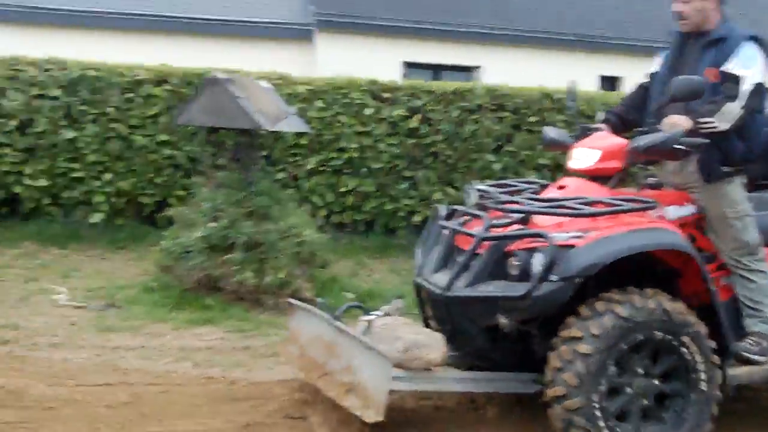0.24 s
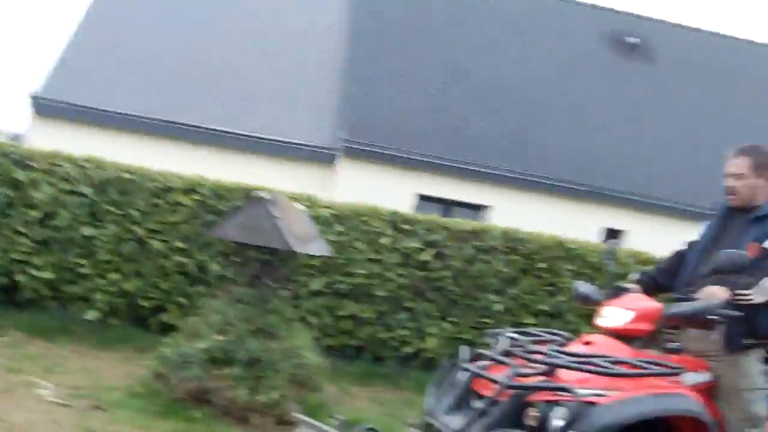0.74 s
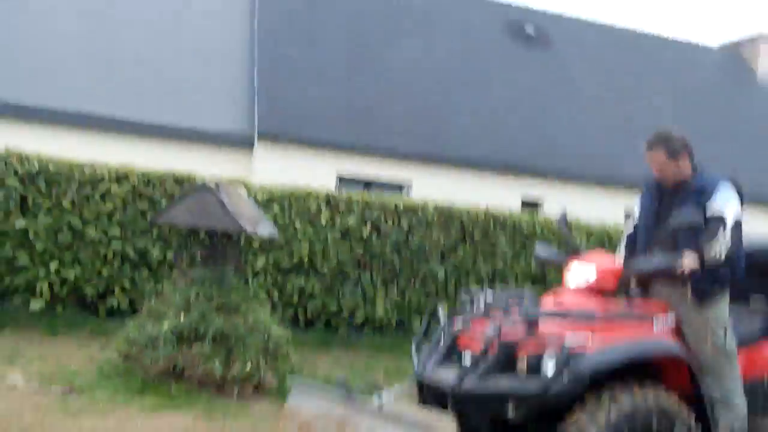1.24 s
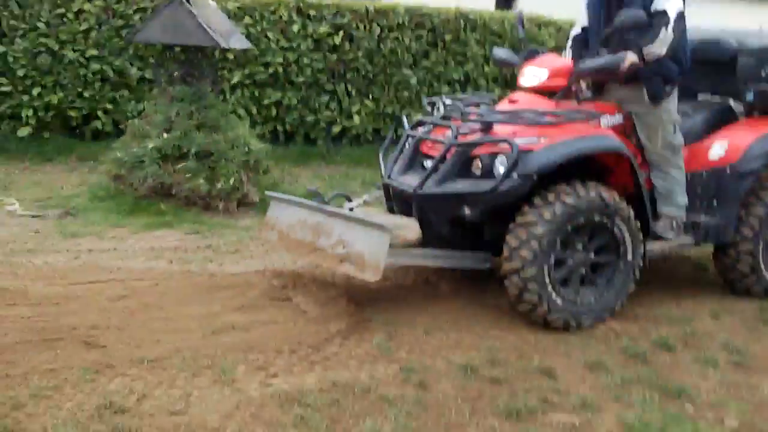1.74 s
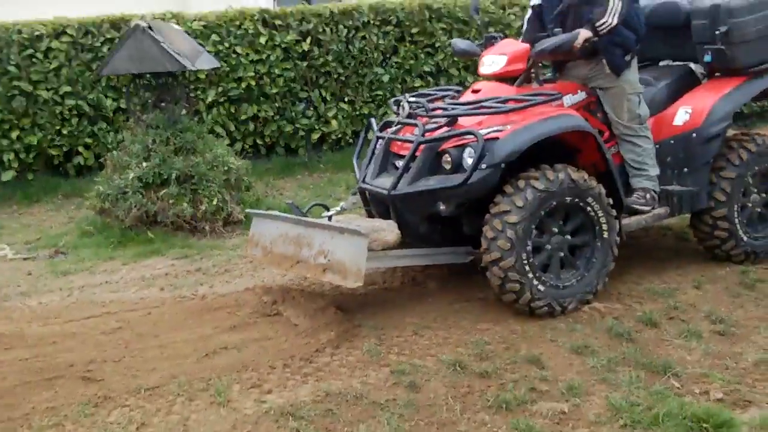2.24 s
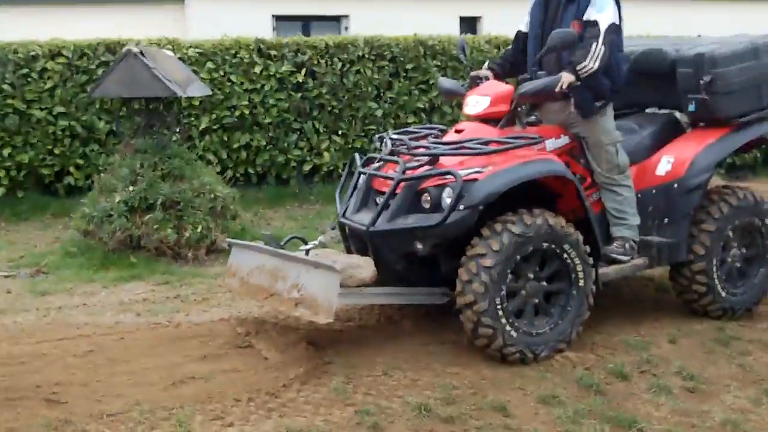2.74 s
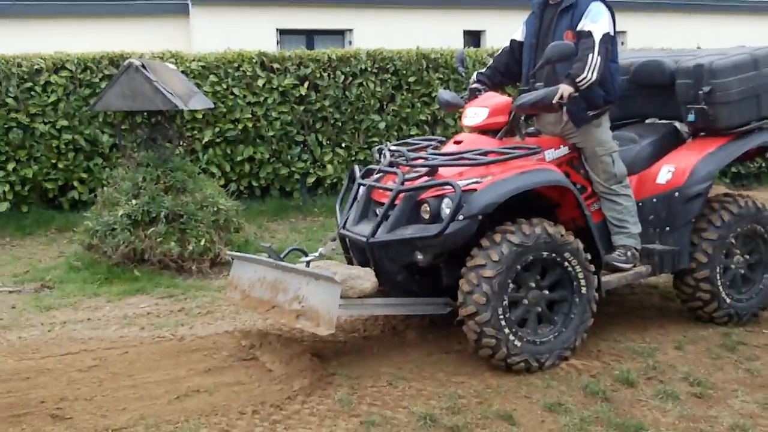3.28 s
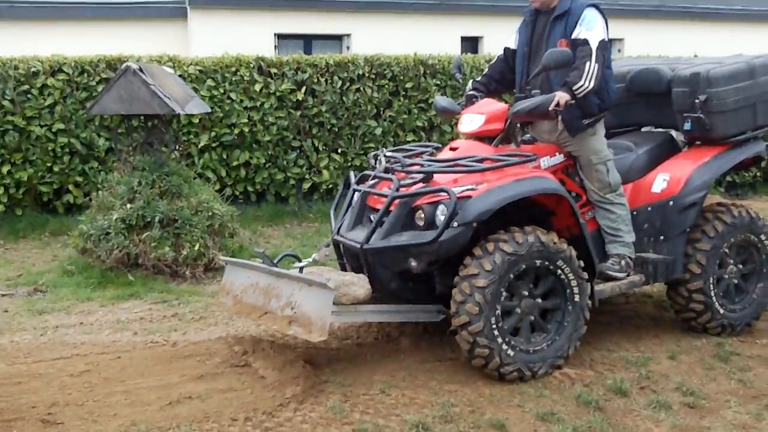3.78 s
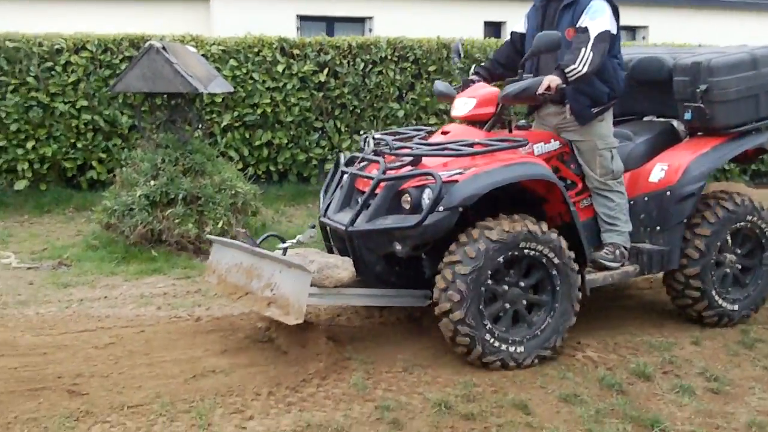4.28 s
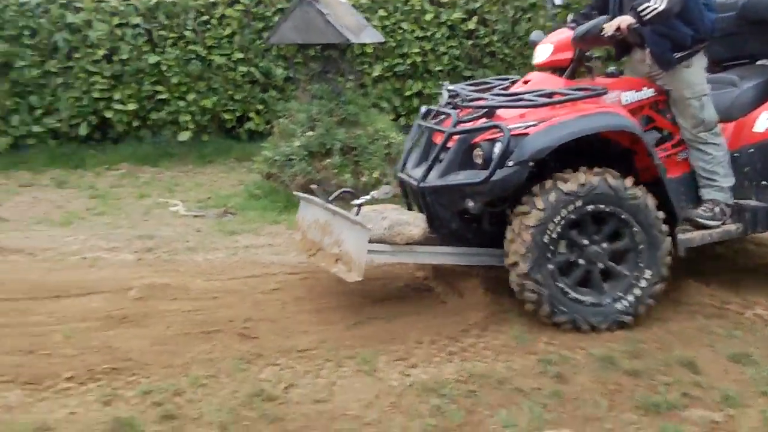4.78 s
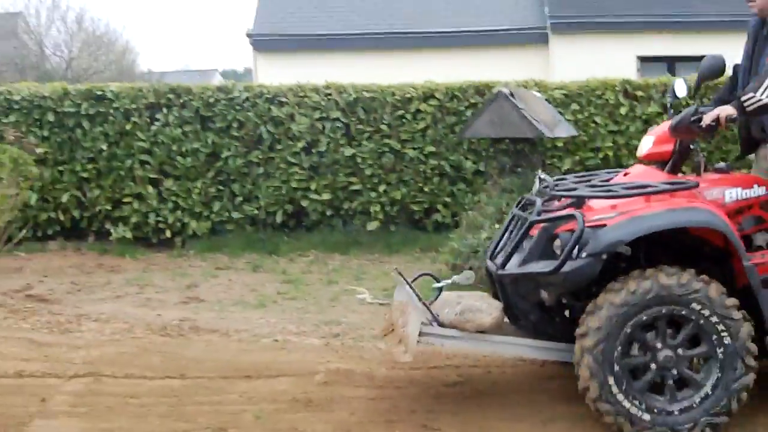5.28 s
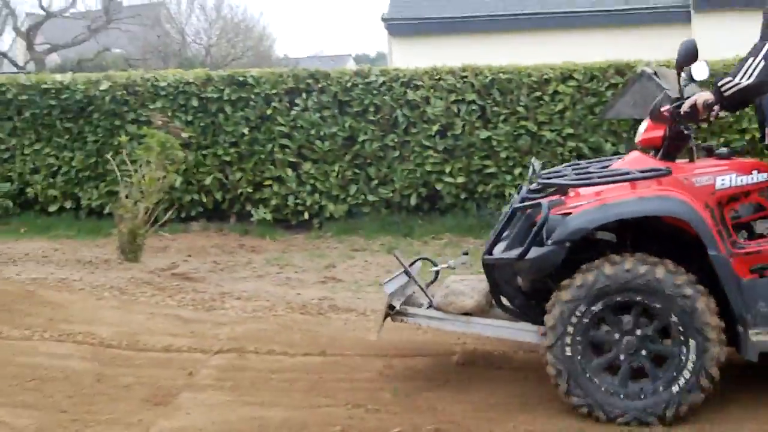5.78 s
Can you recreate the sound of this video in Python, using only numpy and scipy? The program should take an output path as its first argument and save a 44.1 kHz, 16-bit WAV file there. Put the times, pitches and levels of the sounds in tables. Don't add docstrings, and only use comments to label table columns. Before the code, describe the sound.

Low off-road engine putters, then surges into two throaty revs with metallic clatter, interrupted by loud plastic bumps, rubs and distorted jolts close up.

```python
import sys
import numpy as np
from scipy import signal
from scipy.fft import rfft, irfft
from scipy.io import wavfile
from scipy.ndimage import uniform_filter1d, map_coordinates

SR = 44100
rng = np.random.default_rng(int(sys.argv[2]) if len(sys.argv) > 2 else 0)


def dump(signal):
    limited = np.clip(np.atleast_2d(signal).T, -1, 1)
    pcm = np.round(limited * 32767).astype(np.int16)
    wavfile.write(sys.argv[1], SR, pcm)


def field_ratio(decibels):
    return 10 ** (np.asarray(decibels, dtype=float) / 20)


N = 265482
TIME = np.arange(N) / SR

# t/s, rate/firings per s
CRANK_SPEED = [(0.0, 12.08), (1.45, 12.54), (1.92, 13.21), (2.49, 13.6), (2.7, 12.38), (2.88, 13.76),
               (3.21, 12.66), (3.32, 16.66), (3.83, 20.61), (4.03, 24.27), (4.2, 22.14), (4.36, 22.91),
               (4.54, 19.71), (4.82, 19.87), (5.1, 23.65), (5.2, 22.75), (5.86, 24.96), (6.02, 23.56)]
# t/s, exhaust level/dB, load share/0-1
THROTTLE = [(0, 1.2, .03), (1.1, 0, .03), (2.4, -.3, .12), (3.2, -3.2, .09), (3.3, .3, .4), (3.5, .1, .42),
            (3.62, 3.4, .59), (3.72, 3.2, .6), (3.8, -.8, .96), (4.1, -1.8, .96), (4.2, -.2, .85),
            (4.55, -1.5, .84), (4.75, .4, .5), (5, 5, .76), (5.1, 2.8, .93), (5.3, 2.4, .95),
            (5.6, 6.1, .97), (6.02, 6.2, .82)]
# f/Hz, t60/s, signed size at idle, signed size under load
PIPE_MODES = [(54.4, 0.081, -0.199, 0.239), (81.4, 0.338, 0.075, 0.032), (111.5, 0.056, 0.909, 0.533),
              (146.0, 0.101, -2.301, -1.92), (147.2, 0.096, 2.26, 1.409), (191.8, 0.185, -0.04, -0.001),
              (258.3, 0.055, 0.035, 0.09), (294.7, 0.072, 0.025, -0.066)]
# f/Hz, t60/s, signed size at idle, signed size under load
INTAKE_MODES = [(54.4, 0.081, -0.046, 0.052), (81.4, 0.338, 0.007, 0.005), (111.5, 0.056, -0.033, -0.004),
                (146.0, 0.101, -0.035, -0.018)]
# f/Hz, t60/s, signed size
BOOM_MODE = (144.5, .3, -.33)
# f/Hz, level/dB per Hz
FLOW_SPECTRUM = [(30, -23), (70, -1.5), (110, 0.5), (145, -0.5), (190, -6.5), (240, -15), (290, -28),
                 (400, -33), (800, -120)]
# f/Hz, level/dB per Hz
GEAR_SPECTRUM = [(880, -28), (1500, -16.5), (1730, -15.5), (2010, -14), (2470, -9.5), (3010, 1),
                 (4050, -12), (4450, -10), (5200, -18.5), (6760, -37), (11400, -120)]
# f/Hz, level/dB per Hz
BELT_SPECTRUM = [(2590, -13), (4400, -6.5), (5500, -4.5), (6960, 1.5), (7800, -6.5), (8470, -14),
                 (9290, -10), (11600, -20.5), (12800, -24.5), (15200, -27), (16200, -29)]
# f/Hz, level/dB per Hz
FRAME_SPECTRUM = [(120, -37), (200, -10), (217, 12), (247, -4), (287, -2.5), (354, -20.5), (568, -14),
                  (722, -17), (865, -14.5), (1250, -21), (1460, -23), (1730, -47), (2200, -35), (2860, -65),
                  (4840, -120)]
# t/s, level/dB, length/s
SCRAPES = [
    (2.04, 4.5, 0.064),
    (3.548, 1.5, 0.12),
    (4.204, 1.5, 0.34),
    (5.305, 2, 0.17),
]
# f/Hz, level/dB per Hz
WINCH_SPECTRUM = [(880, -54), (1500, -18), (1710, -41), (1880, -18), (2080, -19), (2210, -15.5), (3180, 1),
                  (3520, -3), (5020, -12), (5440, -5.5), (6960, 1), (8570, -16.5), (9370, -10.5),
                  (12600, -31), (16000, -33)]
# f/Hz, t60/s
SHELL_MODES = [(199, 0.095), (404, 0.035), (560, 0.032), (730, 0.022), (931, 0.022), (1270, 0.037),
               (1600, 0.007), (2100, 0.024)]
# t/s, peak level/dB, low part/dB, high part/dB
TAPS = [(.54, -25, 5, -15), (0.611, -32, 6, 1), (0.738, -37, -19, 7.5), (1.021, -18.5, -5, -5.5),
        (1.598, -5.5, -7, -7), (1.707, -18, -0.5, -22), (1.904, -21, -2.5, -9), (1.95, -19.5, 2, -6.5),
        (1.991, -31, 5.5, -16), (2.502, -22, -6, -29), (2.97, -25, -5, -10), (2.946, -12.5, -0.5, -1),
        (3.851, -32.5, 14.5, -21), (4.737, -12.5, -14, -20), (5.072, -16.5, -6, -27),
        (5.716, -16.5, -1.5, -9), (5.812, -7, -15, -19)]
# t/s, peak level/dB, low part/dB, high part/dB
SNAPS = [(2.058, -28, -16, -9), (2.406, -10.5, -3, -8.5), (2.478, -18.5, -1, 0), (2.763, -0.5, -5.5, -5.5),
         (3.235, -20, -4, -13), (3.468, -22, -5, -17), (3.908, -10.5, -6.5, -1), (4.579, -15, -24, -15),
         (4.704, -20.5, 1.5, -13), (4.824, 0, 3.5, -7), (5.113, -17.5, -7, -24), (5.527, -19, -24, -9),
         (5.912, -22.5, 10, -15), (5.937, 4, -17, -8)]
# t/s, signed push, rebound f/Hz, length/s
SUDDEN_JOLTS = [(.541, -.34, 90, .009), (1.603, -.37, 34, .009), (1.756, -.37, 2, .013),
                (1.901, .21, 11, .046), (2.4057, -.93, 41, .056), (2.764, -1.43, 33, .01),
                (2.9456, .8, 52, .011), (2.969, .25, 19, .044), (4.7077, 1.2, 29, .022),
                (4.8273, -1.02, 27, .016), (4.8457, .52, 20, .023), (5.7335, .71, 12, .033),
                (5.916, -.37, 44, .034)]
# t/s, signed push, rebound f/Hz, length/s
SQUEEZES = [(.691, .24, 23, .016), (1.643, -.22, 29, .038), (1.721, -.31, 42, .011), (1.863, .29, 14, .03),
            (1.9958, .88, 21.5, .032), (2.434, -.24, 30, .08), (2.671, .29, 8, .08),
            (2.495, -.19, 23, .036), (2.7602, 1.19, 32, .022), (3.2358, -1.06, 55, .003),
            (3.242, .38, 8, .064), (3.8553, .64, 10, .078), (3.8744, -.66, 15, .026),
            (3.9092, .99, 73, .005), (4.7026, -.96, 26, .067), (4.7412, 1.02, 25, .027),
            (4.8236, .33, 25, .056), (5.929, .4, 8, .02), (5.9375, .9, 32, .012)]
# f/Hz, level/dB per Hz
TREMOR_SPECTRUM = [(4, -30), (10, -3), (22, 0), (40, -9), (70, -26), (300, -56), (600, -120)]
# t/s, level/dB, length/s, bright over dull level/dB
RUBS = [(0.046, -46.5, 0.072, 9), (0.254, -46, 0.035, -7), (0.574, -40, 0.072, 1), (0.684, -47, 0.042, -15),
        (1.767, -43, 0.045, -1), (2.447, -40, 0.035, -8), (2.553, -49.5, .05, -8),
        (2.832, -35.5, 0.087, -8), (5.1, -43.5, 0.048, 8), (5.556, -35.5, 0.033, 9), (5.85, -35, 0.032, 7),
        (5.932, -31, .015, 0)]
# t/s, peak level/dB, dull part/dB
TICKS = [(0.118, -25, -16), (0.239, -36, -7), (0.6, -21.5, -26), (1.948, -37.5, 9), (2.06, -28.5, -6),
         (2.762, -27, -14), (2.9266, -26, 3), (3.566, -25, 1.5), (3.6501, -39, 0), (3.7978, -37, -30),
         (4.3066, -25.5, -6), (4.4019, -26, -11), (4.824, -32, -7), (5.0175, -31, -16), (5.032, -25.5, -13),
         (5.062, -23.5, -16), (5.4839, -26, -8), (5.657, -33, -13), (5.8094, -17.5, -19),
         (5.832, -20.5, -9), (5.91, -22, -16), (5.923, -20.5, -8)]
# f/Hz, level/dB per Hz
HISS_SPECTRUM = [(2000, -120), (4000, -6), (12000, 2), (15700, 1)]
# f/Hz, rms level/dB
WHINES = [(15644, -80), (15704, -80)]

FIRST_FIRING_S = .0446
IDLE_RATE = 12.5
# level at idle/dB, growth/dB per octave of speed, growth/dB per dB of exhaust
GEAR_GROWTH, BELT_GROWTH, FRAME_GROWTH = (-39, 3.7, 0.067), (-44.5, 5, 0.24), (-47, 3.7, 0.33)


def unit(x):
    return x / np.sqrt(np.mean(x ** 2) + 1e-20)


def curves(rows):
    s, *columns = np.transpose(rows)
    return [np.interp(TIME, s, column) for column in columns]


def wobble(rate):
    knots = rng.standard_normal(int(N * rate / SR) + 4)
    return map_coordinates(knots, [TIME * rate])


def coloured(x, spectrum, lo_hz=0, hi_hz=SR):
    hz = np.fft.rfftfreq(N, 1 / SR) + 1
    f, db = np.transpose(spectrum)
    edges = 1 / (1 + (lo_hz / hz) ** 8) / (1 + (hz / hi_hz) ** 8)
    gain = field_ratio(np.interp(np.log(hz), np.log(f), db))
    return unit(irfft(rfft(x) * gain * edges, N))


def gritty(spiky_db, patchy_db):
    grains = rng.standard_normal(N) * field_ratio(spiky_db * wobble(900))
    z = signal.stft(grains, nperseg=512)[2]
    across_hz = uniform_filter1d(rng.standard_normal(z.shape), size=6, axis=0)
    patches = unit(uniform_filter1d(across_hz, size=8, axis=1))
    return signal.istft(z * field_ratio(patchy_db * patches), nperseg=512)[1][:N]


def ring(hz, t60, rise, t):
    onset = (1 - np.exp(-t / rise)) ** 2
    return np.sin(2 * np.pi * hz * t) * field_ratio(-60 * t / t60) * onset


def add(track, s, sound):
    part = track[round(s * SR):][:len(sound)]
    part += sound[:len(part)]


def cycles():
    done = np.cumsum(curves(CRANK_SPEED)[0]) / SR
    return done - done[round(FIRST_FIRING_S * SR)]


def beats_at(lag):
    return np.diff(np.floor(cycles() - lag), prepend=0) == 1


def exhaust():
    level_db, load = curves(THROTTLE)
    idle, loaded = field_ratio(level_db) * (1 - load), field_ratio(level_db) * load
    pushed_db = load * np.maximum(level_db - 2.2, 0)
    boom = pushed_db / 3.9
    rasp_db = 2 - 3.1 * pushed_db
    left_db = 20 * np.log10(1 - .67 * boom)
    burn_db = .7 * wobble(30)

    # modes, lag in cycles, rise in s, level in dB
    parts = [(PIPE_MODES[:1], 0, .0041, 0),
             (PIPE_MODES[1:6], 0, .0041, left_db),
             (PIPE_MODES[6:], 0, .0041, rasp_db),
             (INTAKE_MODES, .462, .0007, 0)]
    out, t = np.zeros(N), np.arange(SR // 2) / SR
    for modes, lag, rise, part_db in parts:
        beats = beats_at(lag)
        for column, level in enumerate((idle * field_ratio(0.51), loaded * field_ratio(0.45))):
            voice = sum(size[column] * ring(hz, t60, rise, t) for hz, t60, *size in modes)
            out += signal.oaconvolve(beats * level * field_ratio(part_db + burn_db), voice)[:N]

    boom_hz, boom_t60, boom_size = BOOM_MODE
    boom_voice = boom_size * ring(boom_hz, boom_t60, .0041, t)
    out += signal.oaconvolve(beats_at(0) * boom, boom_voice)[:N]
    flow = idle * field_ratio(-35.0) + loaded * field_ratio(-27.5)
    return out + flow * coloured(rng.standard_normal(N), FLOW_SPECTRUM)


def clatter():
    octaves = np.log2(curves(CRANK_SPEED)[0] / IDLE_RATE)
    exhaust_db = curves(THROTTLE)[0]
    scrape_db = sum(db * np.exp(-((TIME - s) / length) ** 2) for s, db, length in SCRAPES)
    nearer_db = 0.3628 * TIME

    def grown_db(growth):
        db, per_octave, follows = growth
        return db + per_octave * octaves + follows * exhaust_db + nearer_db

    crank = 2 * np.pi * cycles()
    beat_db = 0.44 * np.cos(2 * crank - .8) + 0.42 * np.cos(crank + 0.18) + 0.098 * wobble(9)
    beat = field_ratio(beat_db)
    rattle = beat * gritty(spiky_db=1.0, patchy_db=1.14)
    hum = beat * gritty(spiky_db=0.0, patchy_db=2.0)
    gear = field_ratio(grown_db(GEAR_GROWTH) + scrape_db) * coloured(rattle, GEAR_SPECTRUM, hi_hz=5120)
    belt = field_ratio(grown_db(BELT_GROWTH) + 0.26 * scrape_db) * coloured(rattle, BELT_SPECTRUM, lo_hz=4420)
    frame = field_ratio(grown_db(FRAME_GROWTH) + 0.27 * scrape_db) * coloured(hum, FRAME_SPECTRUM, lo_hz=310)
    squeal = field_ratio(-71) * np.sin(2 * np.pi * 11988 * TIME + .6 * wobble(9))
    return gear + belt + frame + squeal


def winch():
    stop_s, fall_db_per_s = .61, 1500
    level_db = -27 - fall_db_per_s * np.maximum(TIME - stop_s, 0)
    fizz = coloured(gritty(spiky_db=2.5, patchy_db=1), WINCH_SPECTRUM)
    return field_ratio(level_db + .7 * wobble(40)) * fizz


def knocks():
    out, t = np.zeros(N), np.arange(4096) / SR
    bins = np.fft.rfftfreq(len(t), 1 / SR) + 1
    corners_hz = [150, 450, 830, 1300, 2100, 4500, 14000]
    rattle_envelope = field_ratio(11.5 - 60 * t / 0.029) * (1 - np.exp(-t / 0.00036))
    for touches, crack_db in (TAPS, -68), (SNAPS, -16):
        for s, db, low_db, high_db in touches:
            corners_db = [low_db - 2.0, low_db, -2.5, high_db, crack_db, crack_db - 11.0, crack_db - 27]

            def place_db(hz):
                return np.interp(np.log(hz), np.log(corners_hz), corners_db)

            shell = sum(field_ratio(place_db(hz) + rng.normal(0, 1.5)) * ring(hz, t60, .0003, t)
                        for hz, t60 in SHELL_MODES)
            loose = irfft(rfft(rng.standard_normal(len(t))) * field_ratio(place_db(bins)))
            add(out, s, field_ratio(db - 3.5) * (rattle_envelope * loose - shell))
    return out


def handling():
    pushes = np.zeros(N)
    for jolts, rise_s in (SUDDEN_JOLTS, .001), (SQUEEZES, .003):
        for s, push, hz, length in jolts:
            t = TIME - s
            build_up = np.exp(-abs(t) / rise_s)
            rebound = np.cos(2 * np.pi * hz * t) * np.exp(-(t / length) ** 2)
            pushes += push * np.where(t < 0, build_up, rebound)
    soft = signal.filtfilt(*signal.butter(2, 420 / (SR / 2)), pushes)
    settle_s = 0.36
    nearby = np.sqrt(abs(uniform_filter1d(soft ** 2, round(settle_s * SR))))
    grip = field_ratio(-28) + field_ratio(-17.5) * nearby
    tremor = grip * field_ratio(3.5 * wobble(24)) * coloured(rng.standard_normal(N), TREMOR_SPECTRUM)
    return 1.032 * soft + tremor


def rubs():
    f, out = np.fft.rfftfreq(N, 1 / SR), np.zeros(N)
    slips = rfft(gritty(spiky_db=3.5, patchy_db=2.5))
    damping = 0.92
    for modes, side in (SHELL_MODES[1:2], -.5), (SHELL_MODES[2:6], .5):
        answer = 0
        for hz, t60 in modes:
            drive = 1j * f * damping * 2.2 / t60
            answer = answer + drive / (hz * hz - f * f + 1j * f * damping * 1.16 / t60)
        drag = sum(field_ratio(db + side * bright_db) * np.exp(-((TIME - s) / length) ** 2)
                   for s, db, length, bright_db in RUBS)
        out += drag * unit(irfft(slips * answer, N))
    return out * field_ratio(2.7 * wobble(60) - 4.5)


def ticks():
    bright, dull, t = np.zeros(N), np.zeros(N), np.arange(SR // 20) / SR
    for s, db, dull_db in TICKS:
        add(bright, s, field_ratio(db - 4 - 60 * t / 0.045))
        add(dull, s, field_ratio(db + dull_db - 1.0 - 60 * t / 0.057))
    bright_noise = coloured(rng.standard_normal(N), BELT_SPECTRUM, hi_hz=9400)
    dull_noise = coloured(rng.standard_normal(N), GEAR_SPECTRUM)
    return bright * bright_noise + dull * dull_noise


def circuits():
    whines = sum(field_ratio(db + 3) * np.sin(2 * np.pi * hz * TIME + wobble(12)) for hz, db in WHINES)
    return field_ratio(-61) * coloured(rng.standard_normal(N), HISS_SPECTRUM) + whines


def scene():
    quad = exhaust() + clatter() + winch()
    hands = knocks() + handling() + rubs()
    return (quad + hands + ticks() + circuits())[None]


def top_cut(x):
    return signal.sosfilt(signal.butter(12, 15760, fs=SR, output="sos"), x)


def record(dry):
    charge = signal.lfilter([2 * np.pi * 5 / SR], [1, 12 / SR - 1], dry)
    hot = np.clip(dry, -1.05 - charge, 1.05 - charge)
    return top_cut(np.clip(hot, -1, 1))


dry = scene()
out = record(dry)
dump(out)
```